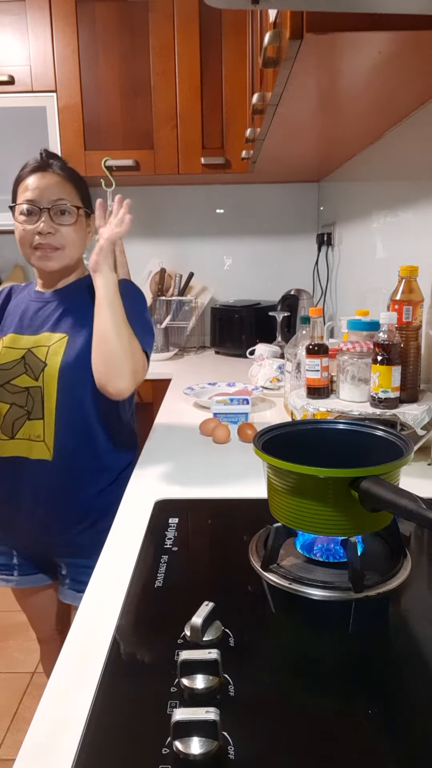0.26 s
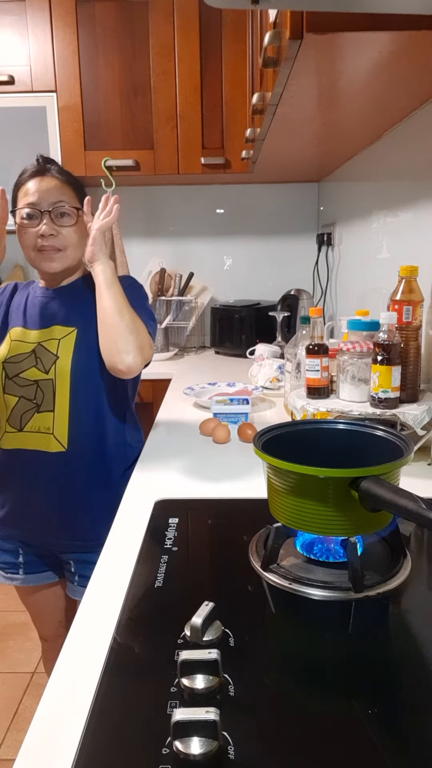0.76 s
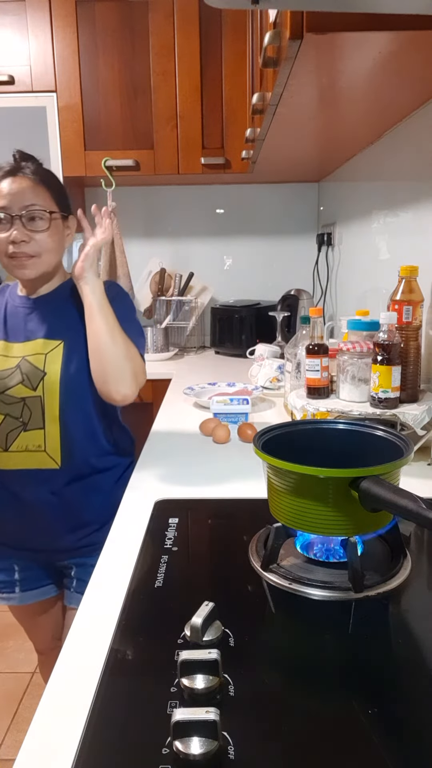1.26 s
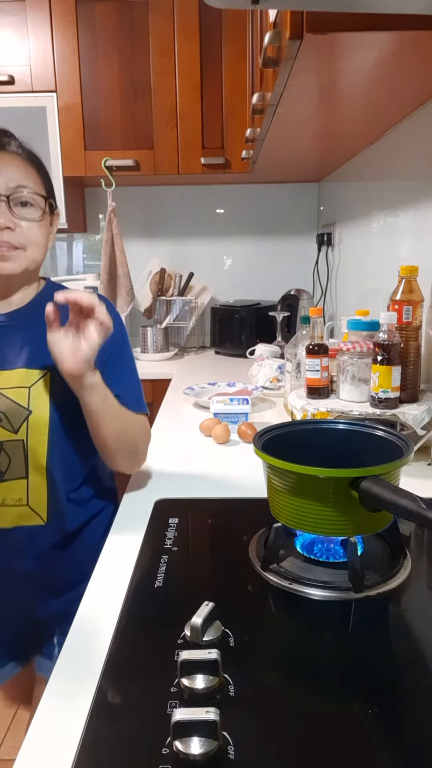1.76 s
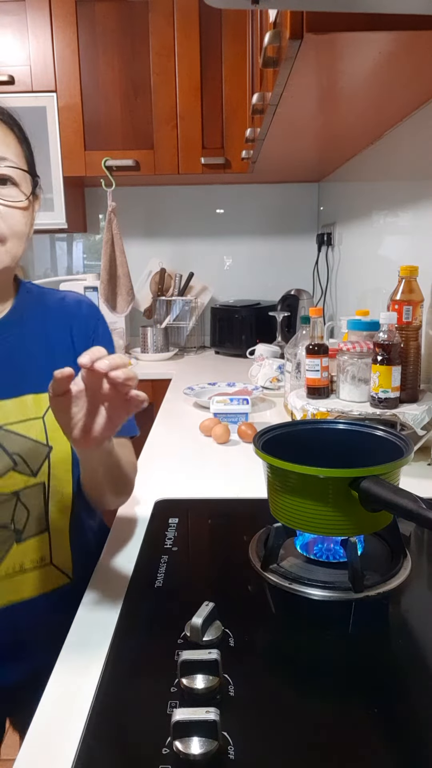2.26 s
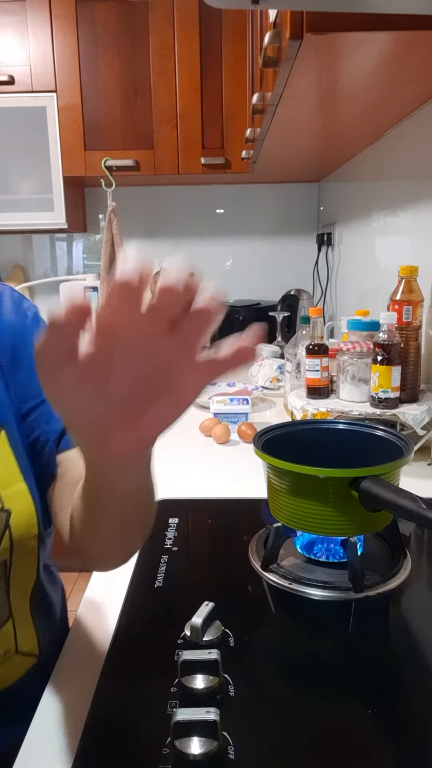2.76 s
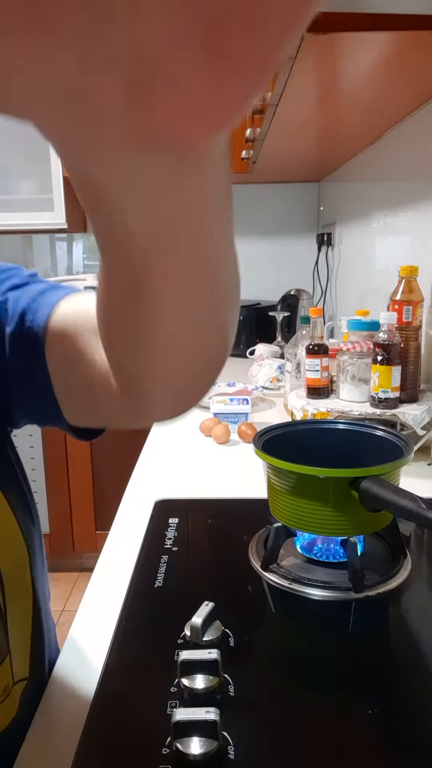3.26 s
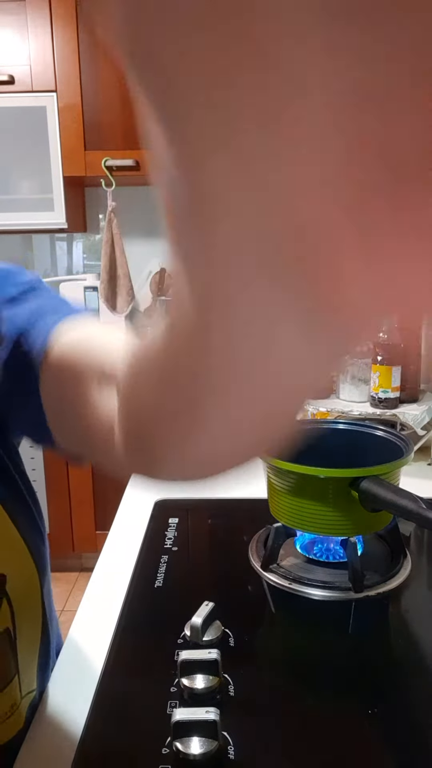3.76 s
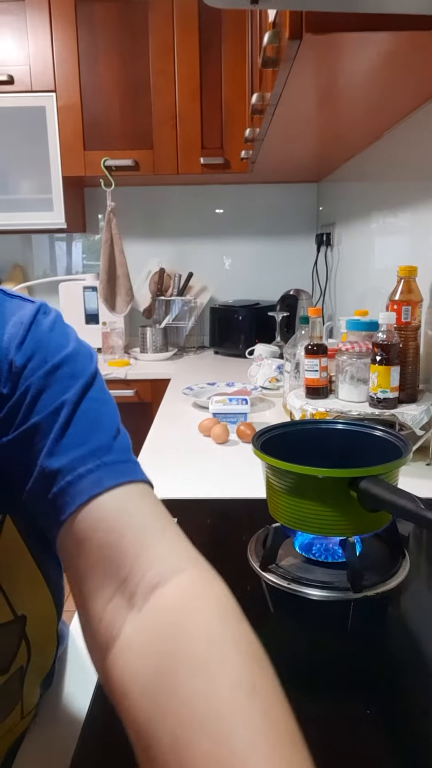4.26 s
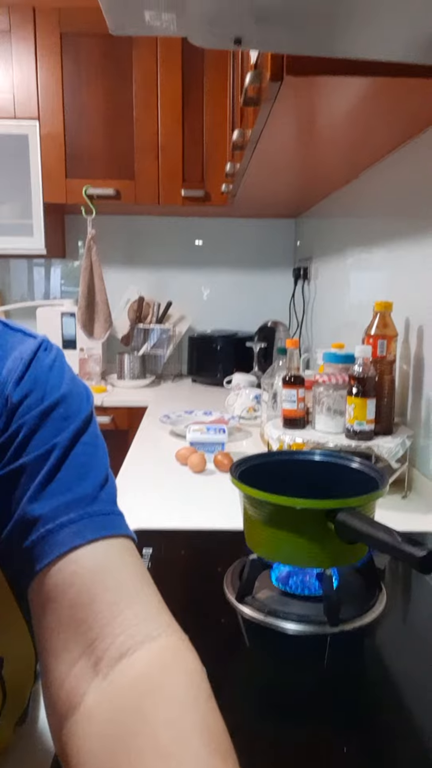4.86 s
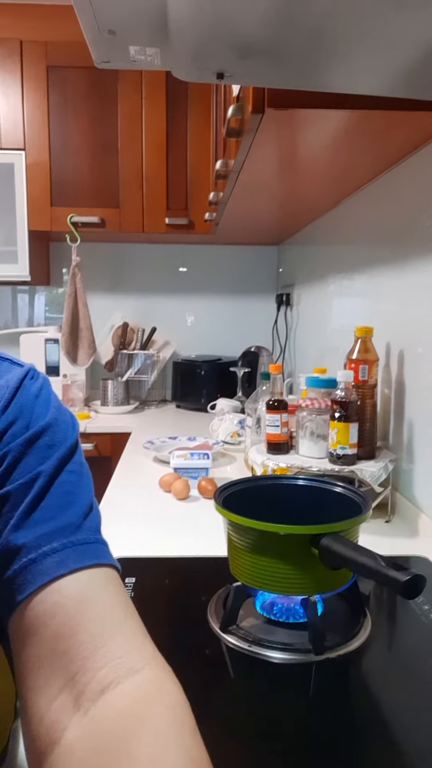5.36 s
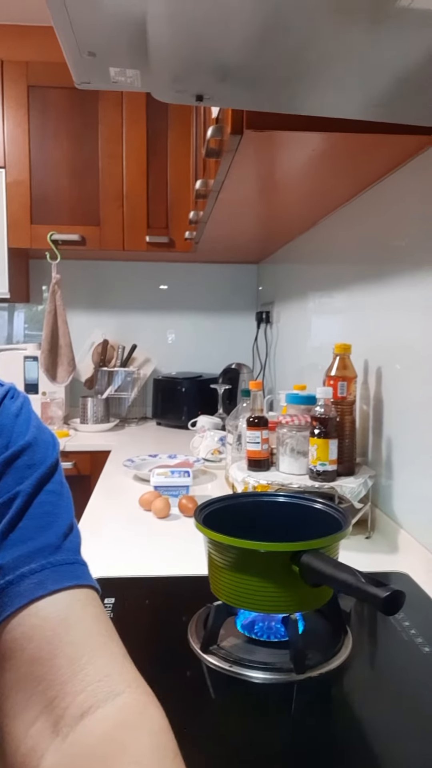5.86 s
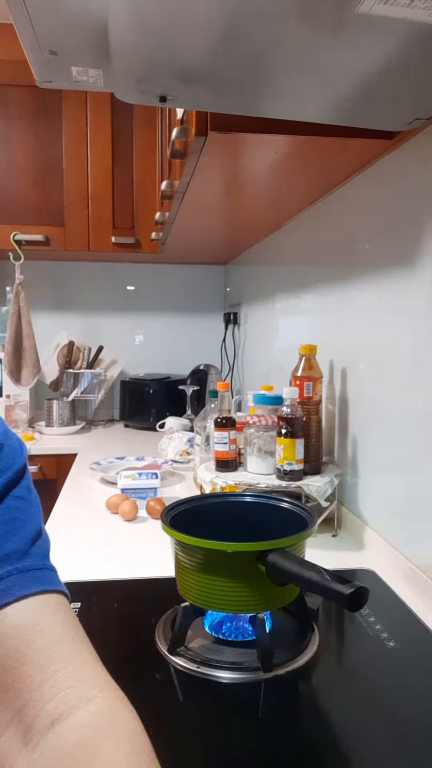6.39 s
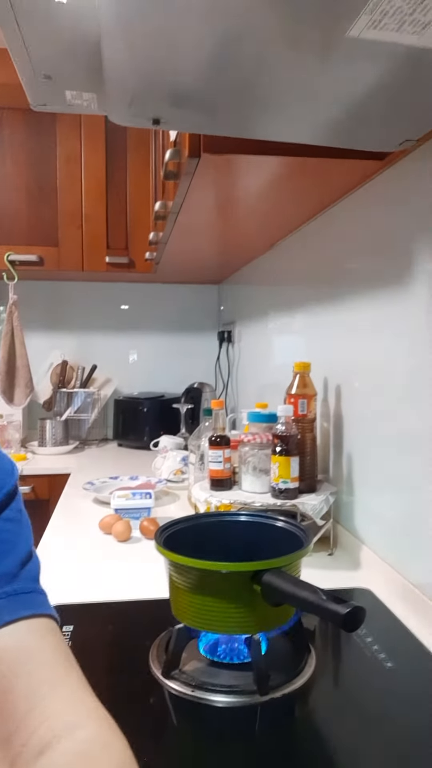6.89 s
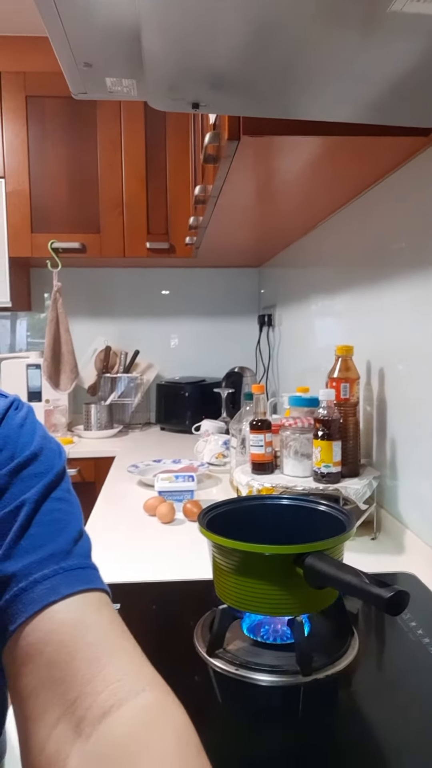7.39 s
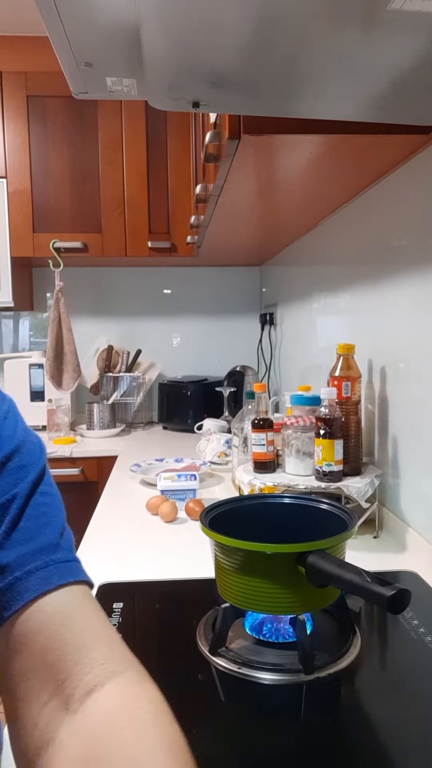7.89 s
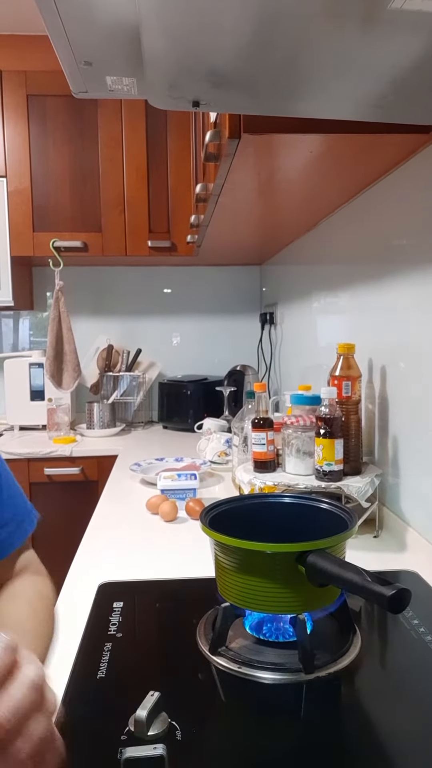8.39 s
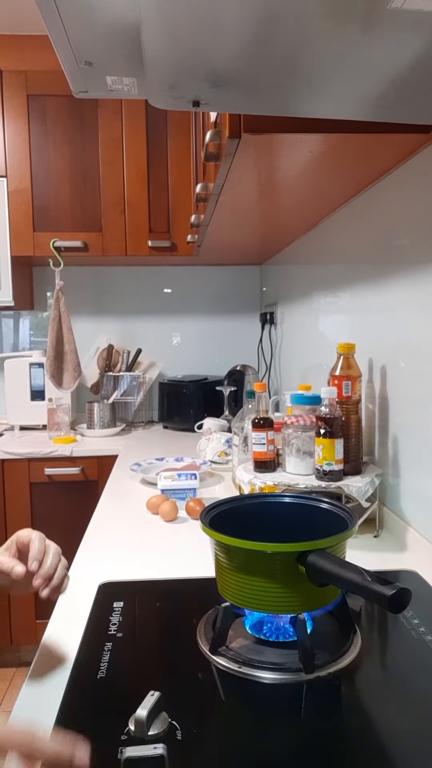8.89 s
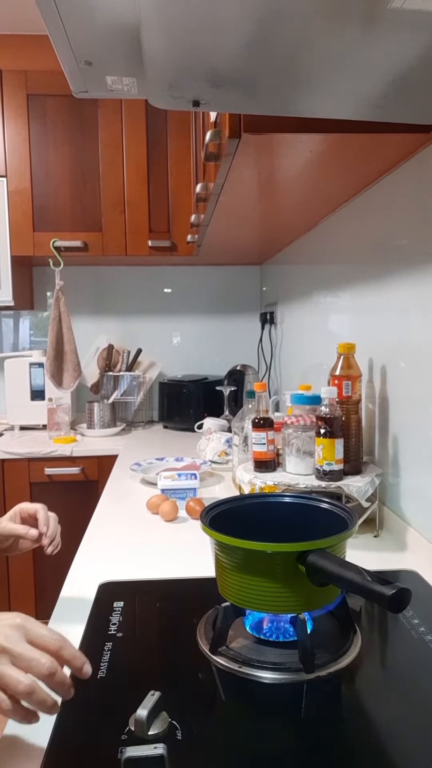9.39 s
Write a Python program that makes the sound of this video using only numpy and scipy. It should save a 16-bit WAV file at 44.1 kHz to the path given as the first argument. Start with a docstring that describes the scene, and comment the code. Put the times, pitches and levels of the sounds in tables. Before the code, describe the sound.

A kitchen extractor hood runs without pause close above the phone: a low, throbbing whir around a wavering tone, broad air rush and faint motor hum. A thin fizz of hiss comes at the very start. Midway the phone is picked up with a tight click and the right side brightens; more sharp clicks follow, then it is put back and the right side dulls again.

```python
"""A kitchen extractor hood runs steadily above a phone by the hob: turbulence booms in its casing, air
rushes through the grease filter, the motor hums faintly, and the blades' wavering tone near 300 Hz soon firms up.
Thin fizzes of hiss come at the start and now and then later. An arm reaches past, then the phone is
picked up: its case clicks, and its shaded right microphone hears more treble in the hand.
More clicks follow; near the end the phone is put back and the right treble sinks again."""
import sys
import numpy as np
from scipy import signal
from scipy.fft import rfft, irfft
from scipy.io import wavfile

SR = 44100
rng = np.random.default_rng(int(sys.argv[2]) if len(sys.argv) > 2 else 0)


def unload_wav(signal):
    """Save mono or channel-first audio to the path in sys.argv[1] as 16-bit WAV at rate SR, clipped to [-1, 1]."""
    wavfile.write(
        sys.argv[1],
        SR,
        np.round(np.clip(np.atleast_2d(signal).T, -1, 1) * 32767).astype(np.int16),
    )


N = 425124
HZ = np.fft.rfftfreq(N, 1 / SR)
TIME = np.arange(N) / SR


def gain_of(db):
    """Decibels to amplitude."""
    return 10 ** (np.asarray(db) / 20)


def spectrum(rows):
    """Each column of a table, joined by straight lines over log frequency."""
    hz, *columns = np.transpose(sorted(rows))
    return np.array([np.interp(np.log(HZ + 1), np.log(hz), column) for column in columns])


def noise():
    """Spectrum of white noise at 0 dB per Hz."""
    return rfft(rng.standard_normal(N)) * np.sqrt(SR / 2)


def drift(hz):
    """Slow random wander of rms 1, fading out above about hz."""
    wander = irfft(noise() * np.exp(-(HZ / hz) ** 2), N)
    return wander / wander.std()


def move(middle_s, takes_s):
    """One smooth step from 0 to 1, easing in and out."""
    progress = np.clip((TIME - middle_s) / takes_s, -.5, .5)
    return .5 + .5 * np.sin(np.pi * progress)


def hand_moves():
    """The phone is picked up once and put back once; each move is a smooth step."""
    picked_up = move(middle_s=4.58, takes_s=0.38)
    put_back = move(middle_s=7.56, takes_s=0.96)
    return picked_up, put_back


def boom(cutoff_hz=170):
    """Eddies drive each resonance at random; close neighbours beat into a throbbing whir."""
    # resonances of hood and blower casing, levels ahead of the mouth's cut-off:
    # (frequency [Hz], width at -6 dB [Hz], left level [dB per Hz], right level [dB per Hz], left lead [rad])
    resonances = [(202.8, 19, -64, -63.5, 0.7), (259.8, 24.2, -47.5, -52, -0.05),
                  (273.5, 25.8, -47, -48, -0.5), (290, 23.7, -46.5, -47.5, -0.85),
                  (308.7, 17, -50, -41.5, -0.28), (323.04, 11.1, -48.5, -42.5, 0.72),
                  (353.8, 24, -51, -50.5, 0.57), (372.4, 11.2, -56, -52, 1.0), (402.1, 21, -54, -54, 1.08),
                  (432.3, 23.6, -59.5, -68, 1.2), (475.5, 15.4, -61, -70, 0),
                  (494.5, 17.7, -57, -64.5, 0.75), (545, 26, -62.5, -64, 0.57), (605, 33, -69.5, -69.5, 0),
                  (698.4, 57, -67.5, -74.5, 0.66), (877.4, 64, -66.5, -69, 0.44),
                  (1055, 22, -91, -64.5, 0.2), (1099, 49, -67.5, -78, -3), (1397, 21, -85, -70.5, -1.3),
                  (1559, 64, -93, -75, -0.8), (2233, 87, -84, -80.5, -0.5), (3030, 290, -80, -90.5, 1.1),
                  (3770, 180, -81, -87, -1.5)]
    out = np.zeros((2, len(HZ)), complex)
    for hz, width, left_db, right_db, lead in resonances:
        ringing = noise() / (1 + 2j * (HZ - hz) / width) ** 2
        # a standing wave meets each microphone with its own strength and phase
        at_microphones = [gain_of(left_db), gain_of(right_db) * np.exp(-1j * lead)]
        out += np.outer(at_microphones, ringing)
    # the hood's mouth radiates little below its cut-off
    mouth = 1 / np.sqrt(1 + (cutoff_hz / (HZ + 1)) ** 10)
    return irfft(out * mouth, N)


def blades(wander_hz=3.597, wander_rate_hz=4, swell_db=2, swell_rate_hz=10, early_db=-2):
    """The blades chop the air into a tone that wanders with the load, the steady core of the whir."""
    # the tone once firm, before its swell:
    # (frequency [Hz], left level [dB rms], right level [dB rms], left lead [rad])
    blade_pitch = (312, -33.5, -28.1, -0.27)
    hz, left_db, right_db, lead = blade_pitch
    phase = 2 * np.pi * np.cumsum(hz + wander_hz * drift(wander_rate_hz)) / SR
    left = gain_of(left_db) * np.sin(phase)
    right = gain_of(right_db) * np.sin(phase - lead)
    # weaker at first, the tone firms up once
    early = 1 - move(middle_s=3.2, takes_s=1)
    level_db = swell_db * drift(swell_rate_hz) + early_db * early
    return np.sqrt(2) * np.array([left, right]) * gain_of(level_db)


def airflow(flutter_db=0.44, flutter_hz=14):
    """Broad turbulence: alike at both microphones in the bass, diffuse in the treble, fluttering slightly."""
    # the two microphones in the fan's sound: (frequency [Hz], likeness [0-1], left lead [rad])
    microphone_likeness = [(45, .95, -.7), (100, .96, -.5), (220, .96, -.2), (370, .85, .8), (430, .5, .6),
                           (500, .8, .15), (700, .68, .2), (860, .42, 0), (980, .1, 0), (1300, .42, -1.6),
                           (1700, .45, -2.8), (2300, .3, -.6), (3000, 0, 0)]
    # low roar of the duct: (frequency [Hz], left level [dB per Hz], right level [dB per Hz])
    duct_roar = [(20, -97, -98), (36, -80, -92), (49.5, -67.5, -81), (75, -70, -77), (107, -65, -72),
                 (181, -67, -69.5), (230, -85, -85), (477, -63, -70), (500, -65, -77.5), (656, -75, -79.5),
                 (750, -71, -69.5), (827, -67.5, -100)]
    # air through the filter, continuing the roar upward:
    # (frequency [Hz], left level [dB per Hz], right level [dB per Hz])
    filter_rush = [(965, -70.5, -69.5), (1077, -69, -76), (1330, -74, -78), (1630, -74.5, -78),
                   (2430, -81.5, -82.5), (3620, -81.5, -83.5), (3900, -78, -83), (4820, -80.5, -84),
                   (5920, -88.5, -91), (7400, -90, -94), (10450, -86.5, -92), (12600, -89.5, -98.4),
                   (15500, -94, -110)]
    likeness, lead = spectrum(microphone_likeness)
    likeness = np.clip(likeness, 0, 1)
    left = noise()
    shared = likeness * left * np.exp(-1j * lead)
    right = shared + np.sqrt(1 - likeness ** 2) * noise()
    air = np.array([left, right]) * gain_of(spectrum(duct_roar + filter_rush))
    # the room's ripple differs at each place of the phone: as it first stands, in the hand, put back
    picked_up, put_back = hand_moves()
    places = [1 - picked_up, picked_up - put_back, put_back]
    heard = np.zeros((2, N))
    for presence in places:
        # only the diffuse share of the sound carries the ripple
        rippled = air * room_ripple() ** (1 - likeness ** 2)
        heard += presence * irfft(rippled, N)
    return heard * gain_of(flutter_db * drift(flutter_hz))


def room_ripple(depth_db=3.5, smooth_hz=18, fades_hz=3500):
    """Reflections from tiles and cupboards cut peaks and dips into each spectrum, shallower in the treble."""
    smoothing = np.hanning(round(2 * smooth_hz * N / SR))
    ripple = signal.fftconvolve(rng.standard_normal((2, len(HZ))), smoothing[None], "same")
    return gain_of(depth_db * ripple / ripple.std() / np.hypot(1, HZ / fades_hz))


def handling(snap_db=-8, snap_t60=0.014, echo_db=-25, echo_t60=0.15, right_corner_hz=14000):
    """Each click is a bright tick of the case, a hollow knock and a fingertip thud, loud at the left microphone."""
    # clicks of the handled case: (time [s], tick level [dB], tick's top [dB], knock level [dB],
    # knock pitch [Hz], thud level [dB], retuning of case and body by the grip [factor])
    clicks = [(4.3516, -27, 5, -45, 2200, -45, 1.07), (4.3548, -22, -1.5, -21, 1145, -45, 1.07),
              (4.3551, -34, -3, -29, 1440, -45, 1.07), (5.3605, -38, -11, -34, 2250, -34, 1),
              (5.7122, -18.5, -6, -22.5, 2190, -23, .98), (6.0622, -35, -13, -30, 2210, -20.5, .9),
              (6.8706, -15.5, 1.5, -19, 2190, -21, 1), (6.8719, -21.5, 2, -36, 2220, -45, 1),
              (6.9621, -18, -4.5, -24, 2220, -22, 1)]
    # a tick rings the case: (frequency [Hz], level [dB], t60 [s])
    case_modes = [(3780, -6.5, .009), (4230, -3.5, .011), (5400, -9.5, .007), (6400, -11.5, .007),
                  (7200, -11.5, .008), (8900, -8, .009), (12900, -9, .007), (13800, -6, .008),
                  (15100, -11, .006)]
    # a thud rings the phone's body: (frequency [Hz], level [dB], t60 [s])
    body_modes = [(700, 0, .015), (1020, 0, .017), (1800, -10, .016)]
    # the knock's longer ring and short clack: (frequency [multiple of knock pitch], level [dB], t60 [s])
    knock_modes = [(1, 0, .019), (1.08, -1, .006)]
    far_mic_db = -15
    out = np.zeros((2, N))
    t = np.arange(SR // 10) / SR
    # a sharp snap, then its faint scatter off the counter and wall
    fade = gain_of(snap_db - 60 * t / snap_t60) + gain_of(echo_db - 60 * t / echo_t60)
    for s, tick_db, top_db, knock_db, knock_hz, thud_db, grip in clicks:
        snap = fade * rng.standard_normal((2, len(t)))
        # the top sets how bright the tick is; neighbouring case modes swing in opposite directions
        tick = gain_of(tick_db) * shelf(snap + ring(case_modes, grip, t, swing=-0.98), top_db)
        knock = gain_of(knock_db) * ring(knock_modes, knock_hz, t)
        thud = gain_of(thud_db) * ring(body_modes, grip, t)
        left, right = tick + knock - thud
        # the far microphone hears it weak and dull
        far = gain_of(far_mic_db) * soften(right, right_corner_hz)
        add(out, s, np.array([left, far]))
    # the small phone radiates little low sound
    return signal.sosfilt(signal.butter(2, 480, "highpass", fs=SR, output="sos"), out)


def ring(modes, tuning, t, swing=1, tuned_below_hz=5000):
    """Sum of dying vibrations; tuning scales the low modes only, and swing multiplies each next mode."""
    out = np.zeros(len(t))
    for k, (hz, db, t60) in enumerate(modes):
        pitch_hz = hz * tuning if hz < tuned_below_hz else hz
        out += swing ** k * gain_of(db - 60 * t / t60) * np.sin(2 * np.pi * pitch_hz * t)
    return out


def shelf(x, db, corner_hz=8000):
    """Raises or lowers everything above the corner by db, by way of a two-band crossover."""
    low = signal.butter(2, corner_hz, "lowpass", fs=SR, output="sos")
    high = signal.butter(2, corner_hz, "highpass", fs=SR, output="sos")
    bottom = signal.sosfilt(np.vstack([low, low]), x)
    top = signal.sosfilt(np.vstack([high, high]), x)
    return bottom + gain_of(db) * top


def soften(x, corner_hz):
    """One-pole low-pass."""
    r = np.exp(-2 * np.pi * corner_hz / SR)
    return signal.lfilter([1 - r], [1, -r], x)


def add(mix, s, sound):
    """Adds a stereo sound to the mix at time s."""
    part = mix[:, round(s * SR):][:, :sound.shape[1]]
    part += sound[:, :part.shape[1]]


def fizzes(rise_s=0.0074, spurt_db=6, spurt_t60=0.059, right_db=-6, ragged_db=2.8, ragged_hz=90):
    """Thin fizzes of hiss: each stage is a short ragged spurt, then a tail that dies away in the tiled room;
    the first fizz swells in from a faint lead-in."""
    # brief high hiss: (start [s], tail level [dB], tail t60 [s]); the first row is a faint lead-in to the
    # second, together one fizz
    hiss_stages = [(.078, -49, .4), (.104, -39, .55), (2.22, -51, .4), (6.09, -50, .4), (7.11, -51, .35),
                   (7.28, -51, .2)]
    # their colour: (frequency [Hz], relative level [dB])
    hiss_colour = [(3000, -40), (7000, -9), (8800, -9), (10000, 0), (11800, -2), (13000, -4), (15500, -4.5)]
    hiss = irfft(np.array([noise(), noise()]) * gain_of(spectrum(hiss_colour)), N)
    level = np.zeros(N)
    for s, db, t60 in hiss_stages:
        age = np.maximum(TIME - s, 0)
        spurt = gain_of(spurt_db - 60 * age / spurt_t60)
        tail = gain_of(-60 * age / t60)
        level += gain_of(db) * (spurt + tail) * (1 - np.exp(-age / rise_s))
    ragged = gain_of(ragged_db * drift(ragged_hz))
    return hiss / hiss.std() * level * ragged * gain_of([[0], [right_db]])


def motor(waver_hz=4, waver_rate_hz=7, right_db=-5):
    """Faint tones that waver in the draught, weaker on the right."""
    # motor hum near multiples of the mains, and a thin whine: (frequency [Hz], left level [dB rms])
    hum_tones = [(98, -51.5), (151, -56), (200, -60), (1974, -83)]
    hum = np.zeros(N)
    for hz, db in hum_tones:
        turns = np.cumsum(hz + waver_hz * drift(waver_rate_hz)) / SR
        hum += np.sqrt(2) * gain_of(db) * np.sin(2 * np.pi * turns)
    return np.outer(gain_of([0, right_db]), hum)


def placement(sound, shade_hz=3500, left_treble_db=-1.05, arm_shade_db=-1.8, arm_reflects=0.16):
    """A passing arm shades the left treble and reflects sound to the right microphone, which the hand uncovers."""
    # what the right microphone gains when wholly free: (frequency [Hz], gain [dB])
    uncovering = [(400, 0), (800, 1.5), (1500, 6), (2400, 4.5), (5000, 5), (10000, 5.5), (15000, 4)]
    left, right = sound
    # the reaching arm sweeps past once, nearest at 3.85 s
    arm = np.exp(-((TIME - 3.85) / 0.68) ** 2)
    picked_up, put_back = hand_moves()
    # how free the right microphone is: 0 as it first stands, 1 wholly free, below 0 more shaded
    free = 0.76 * (picked_up - put_back) - 0.2 * put_back
    treble = irfft(rfft(left) * HZ ** 2 / (HZ ** 2 + shade_hz ** 2), N)
    gained = irfft(rfft(right) * (gain_of(spectrum(uncovering)[0]) - 1), N)
    shaded_left = left + (gain_of(left_treble_db + arm_shade_db * arm) - 1) * treble
    opened_right = right + (free + arm_reflects * arm) * gained
    return np.array([shaded_left, opened_right])


def fingers(sound, shade_hz=7000):
    """A finger briefly dulls the right microphone as the phone is gripped and let go."""
    # passing fingers: (time [s], half-length of the bell-shaped dip [s], treble gain [dB])
    finger_passes = [(4.51, .1, -3), (7.42, .11, -5)]
    left, right = sound
    cover_db = np.zeros(N)
    for s, length_s, db in finger_passes:
        cover_db += db * np.exp(-((TIME - s) / length_s) ** 2)
    treble = irfft(rfft(right) * HZ ** 4 / (HZ ** 4 + shade_hz ** 4), N)
    return np.array([left, right + (gain_of(cover_db) - 1) * treble])


def scene():
    """The fan and the small sounds as the phone hears them."""
    fan = boom() + blades() + airflow() + motor()
    small_sounds = handling() + fizzes()
    return fingers(placement(fan + small_sounds))


def record(dry, low_cut_hz=36, edge_hz=15850):
    """The microphones' bass cut, then the recorder's steep band limit."""
    thinned = signal.sosfilt(signal.butter(2, low_cut_hz, "highpass", fs=SR, output="sos"), dry)
    lowpass = signal.firwin(1023, edge_hz, window=("kaiser", 9), fs=SR)
    return signal.oaconvolve(thinned, lowpass[None], "same")


dry = scene()
out = record(dry)
unload_wav(out)
```